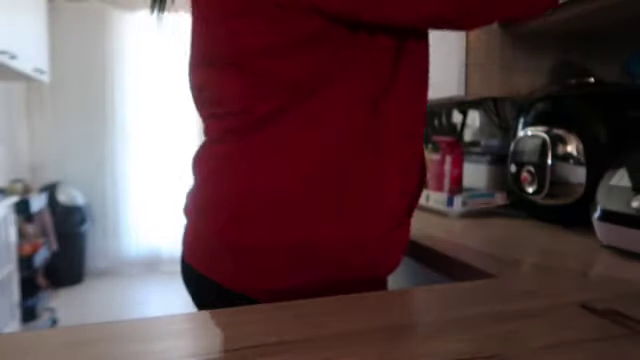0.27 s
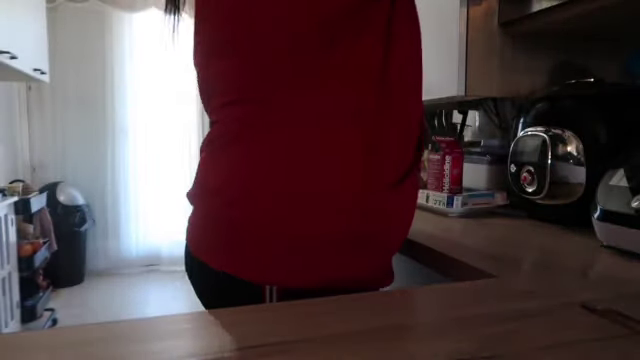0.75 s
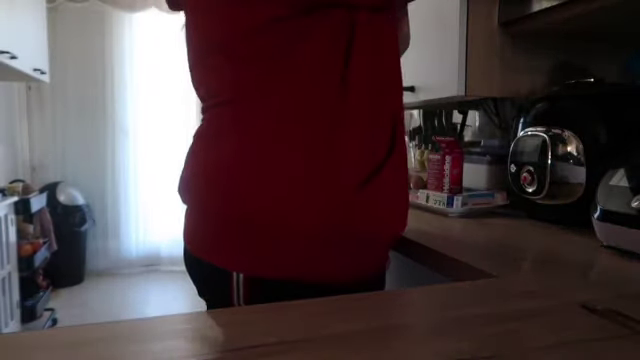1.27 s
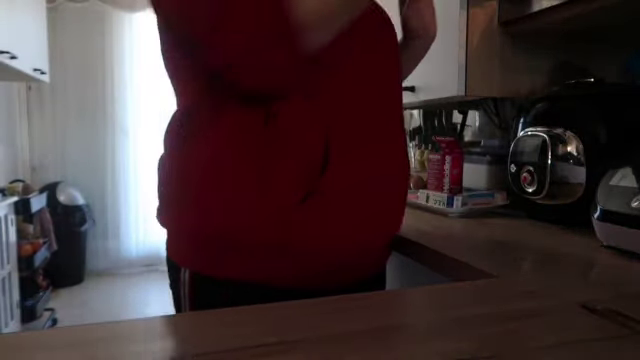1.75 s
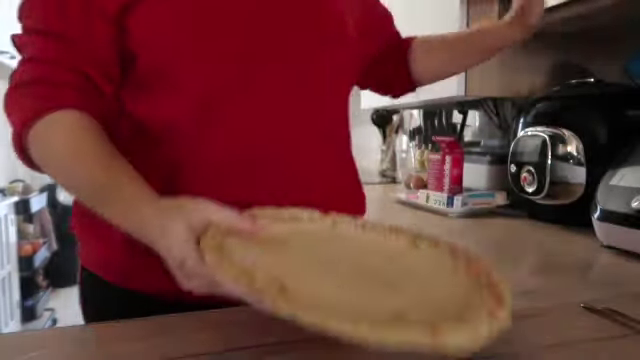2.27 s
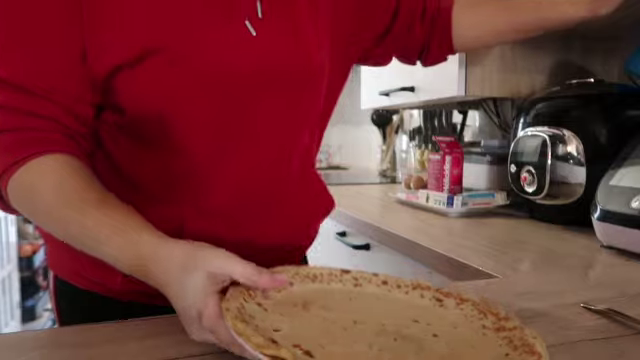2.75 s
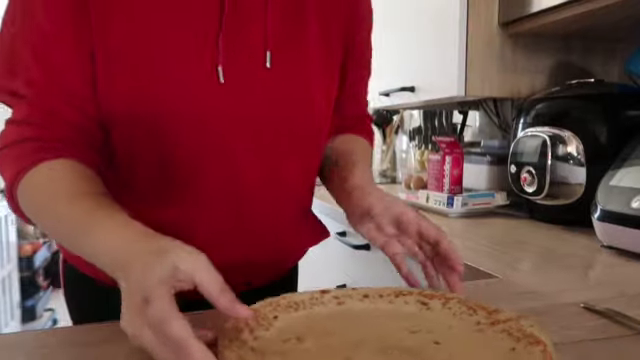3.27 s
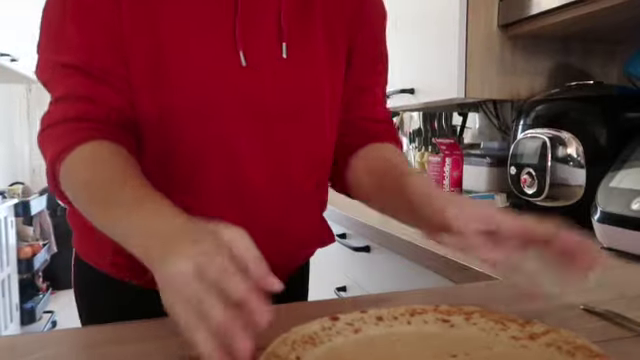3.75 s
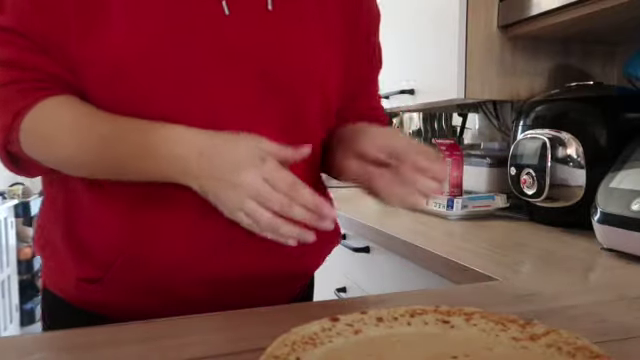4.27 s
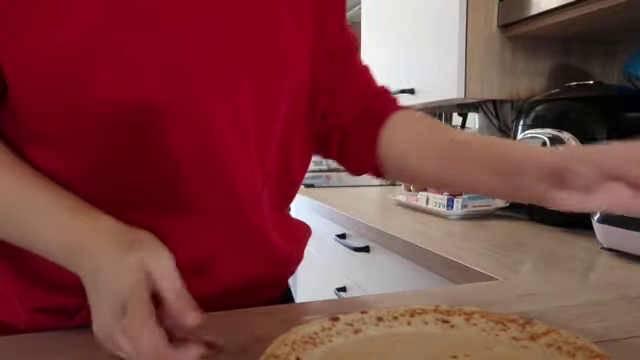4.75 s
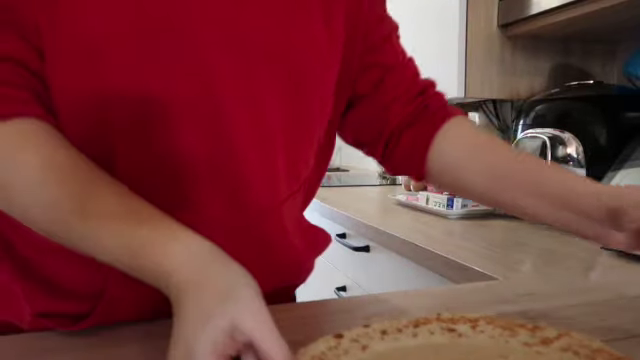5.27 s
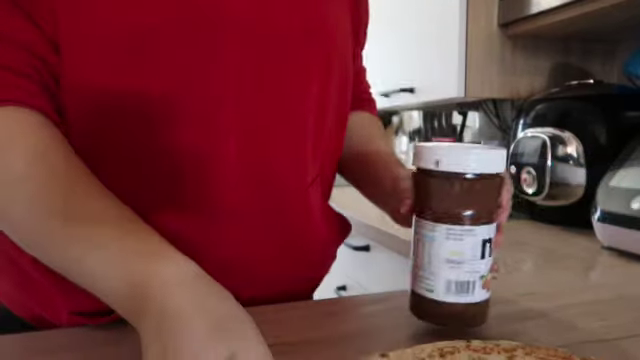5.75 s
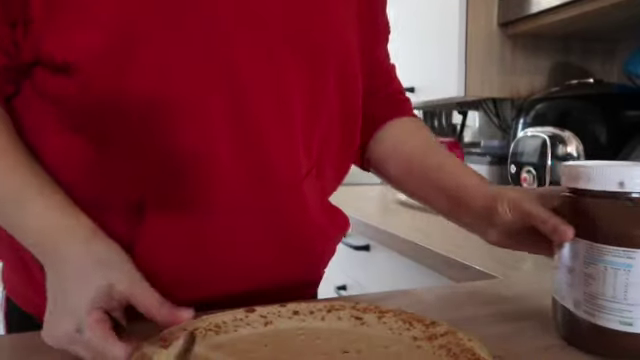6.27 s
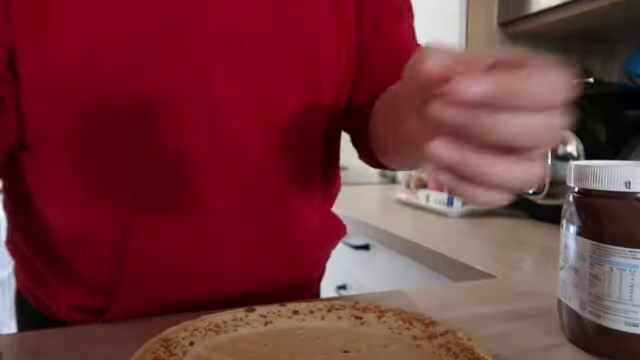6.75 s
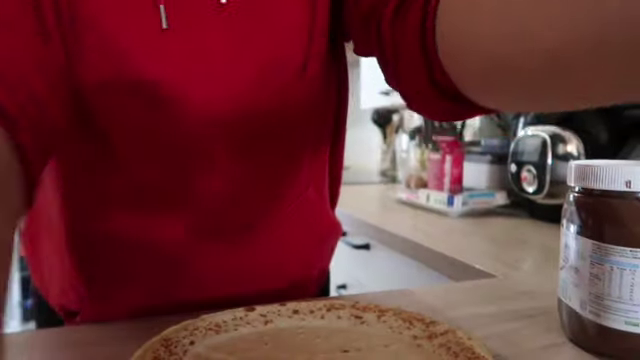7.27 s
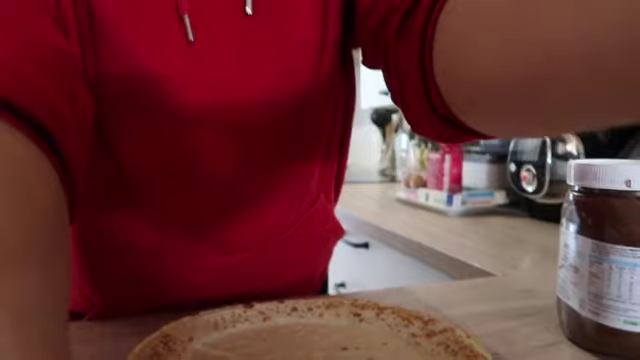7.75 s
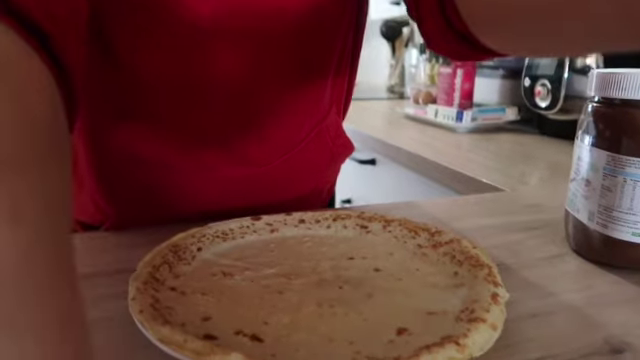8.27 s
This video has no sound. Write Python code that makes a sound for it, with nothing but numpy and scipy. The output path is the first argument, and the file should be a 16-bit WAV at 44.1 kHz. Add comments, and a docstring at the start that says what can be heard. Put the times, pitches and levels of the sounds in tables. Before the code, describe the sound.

Close to a wooden worktop, with quiet room tone: slightly distant plates rattle and slide apart, then one bangs down on the wood and scuffs along it. After a pause a heavy jar scrapes in low, uneven strokes and lands with a very hard knock. A spoon strikes the top, bouncing in rapid bright ticks with a shimmering steel ring, followed by near silence and soft finger taps.

```python
"""In a home kitchen a plate is drawn from a stack in a cupboard, set down and pushed over a wooden worktop.
A glass jar is dragged and knocked on the wood, then a spoon is dropped and slides, ringing; fingers tap close by.
Knocks (a blow and its chatter) and slides (grit of tiny slips) excite modal bodies; slips ring the spoon's steel.
A mid-side microphone close to the worktop hears it with the kitchen's reverberation, over a low room tone;
its converter clips on the hardest blows."""
import sys
import numpy as np
from scipy import signal
from scipy.fft import rfft, irfft, next_fast_len
from scipy.io import wavfile
from scipy.ndimage import uniform_filter1d

SR = 44100
rng = np.random.default_rng(int(sys.argv[2]) if len(sys.argv) > 2 else 0)


def pcm_store(signal):
    """Save signal as 16-bit PCM."""
    levels = np.round(np.clip(np.atleast_2d(signal), -1, 1) * 32767)
    wavfile.write(sys.argv[1], SR, levels.astype(np.int16).T)


N = 375404  # samples

# room tone spectra, mid and side: [f/Hz, relative density/dB]
TONE_MID = [(12, -25.5), (20, -3), (47, -5), (83, -17.5), (145, 2.5), (180, -3), (225, 2), (315, -6),
            (362, -7), (416, -5.5), (549, -13), (631, -11), (767, -14), (2210, -16), (5230, -26),
            (10500, -38), (15500, -59)]
TONE_SIDE = [(24, -64), (40, -27.5), (129, -7), (449, 1.5), (881, -4), (3140, -8.5), (3740, -8),
             (10900, -20.5), (13300, -28), (15500, -43.5)]
# level of the hum in the room tone, which the hiss follows in part: [t/s, level/dB]
HUM_LEVEL = [(0.0, -49), (0.32, -53), (0.55, -44.5), (0.7, -41), (0.8, -48.5), (2.58, -49.5), (2.9, -80),
             (3.1, -62), (3.9, -53.5), (4.3, -55), (4.9, -49.5), (6.55, -65), (6.8, -56), (7.65, -64.5),
             (8.0, -62.5), (8.51, -57)]
HISS_DB, HISS_SHARE = -28, 0.61  # hiss level at a hum of 0 dB; dB of hiss per dB of hum
# level of the rumble before the swells under the thuds: [t/s, level/dB]
RUMBLE_LEVEL = [(0.0, -50), (0.4, -64), (0.52, -28), (0.8, -52.5), (1.7, -57.5), (2.5, -50), (3.1, -65),
                (4.8, -51), (6.9, -54), (7.4, -76.5), (8.0, -83.5), (8.51, -68)]
SHAKE_DB, SHAKE_T60 = -25.5, 0.1  # swell of the rumble relative to a thud; its decay, s

# reverberation time of the kitchen: [f/Hz, t60/s]
KITCHEN_T60 = [(100, 0.54), (400, 0.13), (1500, 0.38), (4000, 0.19), (12000, 0.21)]
EARLY_DB, EARLY_T60 = -8, 0.04  # first echoes at the side capsule; decay in s
# gain of the side capsule's direct sound, echoes and tail: [f/Hz, gain/dB]
SIDE_GAIN = [(60, -24), (110, -37.5), (200, -31.5), (380, -26.5), (700, -25.5), (1290, -17.5), (2380, -20),
             (4400, -4.5), (8120, 3), (15000, 24.5)]
EDGE_HZ = 15600  # band limit after the converter

# modes of the stacked plates: [f/Hz, relative level/dB, t60/s]; broad colour: [f/Hz, relative density/dB]
STACK_MODES = [(360, 3.5, 0.23), (413, 7.5, 0.25), (727, 11.5, 0.14), (937, 7, 0.11), (1040, 6, 0.09),
               (1115, 4, 0.086), (1287, 6, 0.076), (1370, 5.5, 0.036), (1540, -0.5, 0.083), (1830, 1, 0.13),
               (2140, 4.5, 0.19), (2260, 9, 0.054), (2750, 1.5, 0.1), (3340, -2.5, 0.13)]
STACK_COLOUR = [(59, -48), (100, -18.5), (268, -35), (352, -9.5), (582, -21), (703, -12.5), (1020, -4),
                (1530, -13), (2050, -4), (2580, -19.5), (3390, -14), (3680, -32.5), (4730, -35.5),
                (15000, -81.5)]
# the drawn plate: modes [f/Hz, relative level/dB, t60/s]; broad colour [f/Hz, relative density/dB]
PLATE_MODES = [(354.3, 2.7, 0.1), (834, 2.1, 0.1), (974.6, 6.7, 0.07), (1090, 8, 0.076), (1355, 7.5, 0.05),
               (1790, 4.7, 0.19), (1932, 3.2, 0.08), (3148, 6, 0.072), (3442, 7.8, 0.023)]
PLATE_COLOUR = [(59, -40.5), (100, -7), (285, -23.5), (345, -1.5), (582, -21), (1050, -4), (1570, -11.5),
                (1840, -9.5), (2580, -25), (3460, -24.5), (15000, -78.5)]
# the worktop: modes [f/Hz, relative level/dB, t60/s]; broad colour [f/Hz, relative density/dB]
WOOD_MODES = [(234, 3.5, 0.094), (266.4, 4.9, 0.074), (337.5, 5.1, 0.13), (418.4, 0.47, 0.054),
              (526.3, 6.1, 0.11), (673, 3, 0.02), (883, 1.1, 0.1), (1043, 0.38, 0.066), (1323, 6, 0.035),
              (1680, 3.6, 0.013), (2112, 6, 0.011), (2463, 0.77, 0.077)]
WOOD_COLOUR = [(35, -48.5), (60, -32.5), (178, -19), (214, -12), (364, -6), (458, -8), (679, -9),
               (916, -15.5), (2420, -21.5), (6380, -52.5), (15000, -88.5)]
# bowl of the spoon: modes [f/Hz, relative level/dB, t60/s]; broad colour [f/Hz, relative density/dB]
BOWL_MODES = [(573, 7.9, 0.04), (868, 6.6, 0.28), (1100, 0.64, 0.02), (1304, 0.5, 0.095),
              (1500, 1.1, 0.062), (1746, 11, 0.039), (1975, 1.5, 0.031), (2226, 1.9, 0.076),
              (2580, 4.6, 0.022)]
BOWL_COLOUR = [(59, -55), (100, -24), (505, -13.5), (722, -9.5), (1270, -4.5), (1850, -5.5), (2000, 6.5),
               (5020, -15), (5520, -9.5), (9000, -27), (11700, -49), (16000, -67)]
# edges between bass, middle and treble, Hz
CROCKERY_BANDS_HZ, WOOD_BANDS_HZ, BOWL_BANDS_HZ = (1500, 4000), (800, 3000), (1500, 4000)
# treble against bass, a row for knocks then one for slides: [offset/dB, slope/(dB per dB of hardness)]
STACK_TREBLE = [(-17.5, 1.5), (-7, 2)]
PLATE_TREBLE = [(-30, 1.6), (-13, 0.84)]
WOOD_TREBLE = [(-28.5, 3.5), (-9.5, 1.47)]
BOWL_TREBLE = [(-19, 0.89), (-27, 13)]

# knocks, hardness being middle against bass: [t/s, bass peak level/dB, hardness/dB, chatter time constant/ms]
STACK_KNOCKS = [(0.519, -33.5, -5, 25), (0.597, -27, -0.5, 6.6), (0.623, -21.5, 0, 17),
                (1.154, -29.5, -25, 4.1)]
PLATE_KNOCKS = [(1.231, -23, 0, 7.9), (1.357, -17, 0.008, 10)]
SPOON_KNOCKS = [(6.78, -21.5, -10.5, 6.8), (6.881, -2.5, -5.5, 5), (6.927, -10, -9.5, 22),
                (6.994, -2.5, 5.5, 3.9), (7.032, -22, -5.5, 6), (7.85, -44.5, 5.5, 3.8),
                (7.916, -33.5, 6, 1)]
# knocks on the wood: the same four columns, then [strength of the board thud/dB]
WOOD_KNOCKS = [(2.437, -42.5, 6, 5, -50), (2.594, -4, 1, 5.1, -23.5), (2.612, -17, 2, 11, -21.5),
               (2.656, -11.5, 1.5, 9.4, -3), (2.743, -6.5, 2, 0.2, -24), (2.766, -13.5, -6.5, 5, -30.5),
               (3.114, -35, -3, 11, -36.5), (3.154, -24, -3, 11, -33.5), (3.234, -28, -2.5, 3.8, -38.5),
               (3.277, -23.5, -3, 19, -34.5), (3.299, -22.5, 1.5, 6, -39.5), (3.334, -17, -1.5, 16, -34),
               (3.392, -13, 4, 3.6, -45.5), (3.404, -12, 3, 13, -36.5), (3.998, -34, -8, 9.5, -33),
               (4.029, -43, 9.5, 5.8, -34.5), (4.066, -36.5, 10, 6.9, -45), (4.901, -36, -9, 3.2, -34.5),
               (5.046, -23, -15, 13, -34), (5.081, -27.5, 5.5, 6.1, -33), (5.103, -9.5, -15, 18, -15.5),
               (5.238, -18.5, -14, 8.2, -31), (5.404, -13, -8, 8, -38.5), (5.778, -20, -12, 10, -26),
               (6.029, 3, -4.5, 3.4, -19), (6.038, -12, -9.5, 3.6, -30.5), (6.086, -7.5, -12, 1.3, -21),
               (7.531, -33, -15.5, 7.2, -48.5), (7.738, -44, -10, 9.3, -49.5), (7.854, -40.5, 2, 5.4, -53),
               (7.883, -43.5, -19, 12.6, -54)]
# slides, one curve per stroke, brightness being middle against bass: [t/s, bass level/dB, brightness/dB]
STACK_SLIDES = [
    [(0.62, -34.5, 4.5), (0.634, -24.5, 4.5), (0.68, -39.5, -16), (0.78, -53, -3)],
    [(0.79, -44.5, -0.5), (0.86, -23.5, -3.5), (0.94, -22, -4), (1.0, -22.5, -9.5), (1.13, -43, -8.5),
     (1.2, -51, -15)],
]
PLATE_SLIDES = [
    [(1.232, -34.5, -1.5), (1.292, -25, -1.5), (1.348, -32.5, -3.5), (1.382, -18.5, -3.5), (1.42, -43.5, 6),
     (1.46, -46, -4.5), (1.52, -52, 6)],
]
WOOD_SLIDES = [
    [(2.6, -37, 2), (2.638, -32, 2), (2.666, -23, -19), (2.738, -39, -6)],
    [(2.75, -24, -5.5), (2.806, -32, -7), (2.892, -49, -1), (3.05, -51, -11)],
    [(3.125, -47.5, 1), (3.157, -31.5, -8.5), (3.217, -44.5, -7.5), (3.386, -28, -14), (3.416, -29.5, -13),
     (3.45, -34.5, -6), (3.53, -30, -9.5), (3.66, -29, -8.5), (3.754, -33.5, -13.5), (3.9, -77, 5)],
    [(3.99, -47.5, -11), (4.04, -44.5, -10), (4.082, -58, 17), (4.176, -79, 18), (4.25, -83, 19)],
]
JAR_SLIDES = [
    [(5.06, -37, -17.5), (5.095, -27.5, -12), (5.11, -14.5, -17), (5.15, -22, -18.5), (5.19, -30.5, -10),
     (5.31, -22.5, -12.5), (5.385, -24.5, -6), (5.41, -15.5, -12.5), (5.51, -19, -9.5), (5.57, -15, -11.5),
     (5.63, -20, -9), (5.68, -25.5, -16.5), (5.765, -51, 3)],
    [(5.765, -35, -5.5), (5.79, -32.5, -8.5), (5.913, -18.5, -7), (6.02, -21.5, -5), (6.06, -30, -8.5),
     (6.17, -22, -8.5), (6.386, -22.5, -17), (6.448, -37.5, -26.5), (6.55, -54.5, -6)],
]
SPOON_SLIDES = [
    [(6.79, -54.5, -3.5), (6.87, -47, -17)],
    [(6.885, -14, -15.5), (6.914, -35.5, -4), (6.946, -30.5, -5), (6.992, -39, 3.5), (7.002, -28.5, 1.5),
     (7.15, -25, 1.5), (7.22, -30, 1.5), (7.398, -34, 1), (7.512, -51.5, 1.5), (7.62, -66, 1),
     (7.7, -70, 2.5)],
]

# two bands of the crockery that drift, one curve each: [t/s, f/Hz]
CROCKERY_FAVOURED = [
    [(0.83, 896), (0.95, 1023), (1.05, 993), (1.4, 1028)],
    [(0.82, 3500), (1.0, 3400), (1.22, 3520), (1.4, 3430)],
]
# low modes favoured as the place of contact moves over the worktop: [t/s, f/Hz]
WOOD_FAVOURED = [(2.64, 500), (2.66, 308), (2.73, 342), (2.745, 494), (2.9, 480), (3.13, 293), (3.39, 430),
                 (3.47, 296), (3.56, 410), (3.66, 297), (3.77, 285), (5.08, 257), (5.24, 247), (5.3, 352),
                 (5.41, 387.5), (5.599, 396), (5.67, 488), (5.781, 411), (6.03, 413), (6.141, 330),
                 (6.29, 341), (6.399, 244), (7.53, 408.6)]

# single clear notes of crockery: [t/s, f/Hz, level/dB, t60/s]
PINGS = [(1.146, 1370, -30.5, 0.071), (1.382, 1790, -11.5, 0.087)]
# faint fluttering tone while the plate is carried: [t/s, level/dB]
CARRY_LEVEL = [(1.45, -56.5), (1.55, -53), (2.05, -62), (2.35, -57.5), (2.55, -68.5)]
CARRY_HZ, CARRY_WIDTH_HZ = 653, 66
# colour of the thin hiss: [f/Hz, relative density/dB]
FIZZ_COLOUR = [(3500, -30), (5000, -3), (6200, 1), (7500, -9.5), (9000, -18), (11000, -40.5)]
# its level while the jar is moved: [t/s, level/dB]
FIZZ_LEVEL = [(5.08, -73), (5.25, -63), (5.5, -65.5), (5.72, -58.5), (5.95, -55), (6.25, -69), (6.42, -87)]
# its level as a sleeve brushes while the arm comes down: [t/s, level/dB]
RUSTLE_LEVEL = [(1.2, -71), (1.33, -57.5), (1.78, -72), (1.86, -57), (1.94, -80)]
# modes of the landing plate: [f/Hz, level against the blow/dB, t60/s]; blows: [t/s, level/dB]
LANDING_MODES = [(501, 1, 0.034), (708, -13, 0.36), (823, -7, 0.18), (890, -9.5, 0.31), (1150, -8.5, .06),
                 (1630, -7, .05)]
LANDINGS = [(2.596, -15), (2.656, -25.5), (2.745, -12.5), (3.392, -31)]
# bright clash as the plate lands: colour [f/Hz, relative density/dB]; bursts [t/s, level/dB, time constant/ms]
CLASH_COLOUR = [(1180, -40.5), (2000, -5), (3280, 0), (6320, -16), (6840, -19.5), (7810, -17.5),
                (11600, -33.5), (13000, -64)]
CLASHES = [(2.595, -24.5, 2.3), (2.611, -30, 9.2), (2.638, -25, 16), (2.656, -14, 6.4), (2.744, -34, 2.4)]
BOARD_HZ, BOARD_T60 = 146, 0.086  # the whole worktop bends under a heavy blow; decay in s

# ticks of the rattling spoon: [t/s, burst level/dB, burst time constant/ms, pitch f/Hz]
RATTLES = [(7.0313, -16.5, 1.6, 5620), (7.046, -18, 1.8, 3726), (7.0664, -18, 1.6, 3260),
           (7.0879, -13.5, 2, 3910), (7.12, -17.5, 1.5, 6200), (7.143, -15.5, 1.3, 3684),
           (7.1694, -12.5, 2, 1976), (7.189, -20, 1.2, 1755), (7.212, -18, 1.6, 1966),
           (7.252, -19, 1.8, 2720), (7.3195, -21.5, 1.7, 1880), (7.369, -25.5, 1.3, 1690),
           (7.4039, -27, 1.7, 3800), (7.4271, -30, 2, 2230)]
# colour of their bursts: [f/Hz, relative density/dB]
TICK_COLOUR = [(1200, -28.5), (2000, -7), (3100, 7.5), (4300, -17), (5600, -11), (8500, -30), (13000, -54)]
TICK_LIFT_DB, TICK_T60 = -3, 0.025  # short ring of each tick, against its burst; decay in s
# steel modes of the spoon, each group swelling and fading together: [f/Hz, group index]
STEEL_MODES = [(3058, 0), (3505, 0), (4506, 1), (4652, 4), (5476, 2), (7273, 2), (8533, 2), (10402, 3),
               (10910, 3), (11900, 3), (13092, 3), (14056, 3), (14690, 3)]
# gains of each steel mode: [gain to mid capsule/dB, gain to side capsule/dB]
STEEL_TRIM_DB = [(1, -26.5), (-8, -19), (3, -2), (-0.5, -11.5), (1, 2.5), (-16.5, -17), (-22, -2.5),
                 (3.5, 8), (-24, 19.5), (2.5, 5), (-20, 4.5), (-22, -6.5), (-49, -5.5)]
# one level curve per group of steel modes while the spoon rings,
# before damping, restriking and trim: [t/s, level/dB]
STEEL_LEVELS = [
    [(6.9, -49), (6.964, -39), (7.048, -24), (7.07, -21.5), (7.096, -30.5), (7.156, -23.5), (7.19, -40),
     (7.208, -30), (7.238, -45), (7.346, -37), (7.37, -54), (7.398, -43), (7.5, -59)],
    [(6.97, -60), (6.992, -44), (7.07, -53), (7.096, -47), (7.188, -41), (7.262, -37), (7.332, -39),
     (7.41, -56.5), (7.5, -49), (7.55, -65.5)],
    [(6.95, -54), (7.038, -33), (7.066, -38), (7.096, -25.5), (7.132, -29), (7.182, -32.5), (7.2, -37),
     (7.31, -40), (7.358, -34.5), (7.416, -47.5), (7.44, -45), (7.58, -75)],
    [(6.99, -70), (7.012, -76), (7.044, -52.5), (7.064, -64), (7.108, -45), (7.292, -68.5), (7.4, -88),
     (7.5, -84)],
    [(6.9, -47), (6.958, -48.5), (6.985, -39), (7.056, -45), (7.09, -37), (7.216, -46), (7.258, -45),
     (7.3, -50)],
]
STEEL_TAIL_DB_PER_S = 150  # extra fall after the end of each curve
DAMPED, DAMPED_S = 0.21, 0.0048  # touching the wood stifles this share of the ring, this long before a tick
RESTRUCK, RESTRUCK_T60 = 0.34, 0.3  # share of the ring that each tick renews; its decay, s


def amp(db):
    """Level: decibels to amplitude ratio."""
    return 10 ** (np.asarray(db) / 20)


def evened(x):
    """Normalisation to unit root mean square."""
    return x / np.sqrt(np.mean(np.square(x)) + 1e-20)


def read(points, hz):
    """Interpolation of a spectrum along a logarithmic frequency axis."""
    f, value = np.transpose(points)
    return np.interp(np.log(hz + 1), np.log(f + 1), value)


def shaped(x, gain):
    """Linear filtering: multiplies the spectrum by gain(hz)."""
    size = next_fast_len(x.shape[-1])
    return irfft(rfft(x, size) * gain(np.fft.rfftfreq(size, 1 / SR)), size)[..., :x.shape[-1]]


def causal(points):
    """Minimum phase: a filter with this spectrum that starts at once and does not ring ahead."""
    hz = abs(np.fft.fftfreq(8192, 1 / SR))
    log_gain = np.log(amp(np.maximum(read(points, hz), -100)))
    return np.fft.ifft(np.exp(np.conj(signal.hilbert(log_gain)))).real[:4096]


def curves(tables, outside):
    """Piecewise linear motion: joins tables (t, value, ..) into one row of samples for each value column."""
    t = np.arange(N) / SR
    out = np.full((len(tables[0][0]) - 1, N), float(outside))
    for s, *columns in map(np.transpose, tables):
        inside = (t >= s[0]) & (t <= s[-1])
        out[:, inside] = [np.interp(t[inside], s, c) for c in columns]
    return out


def resonator(hz, width_hz):
    """Damped resonance: one second-order section whose pole radius sets the bandwidth."""
    r = np.exp(-np.pi * width_hz / SR)
    return [1, 0, 0, 1, -2 * r * np.cos(2 * np.pi * hz / SR), r * r]


def tilted(db, bright_db, treble):
    """Contact hardness: gains of bass, middle and treble for one level and brightness."""
    offset_db, slope = treble
    return amp([db, db + bright_db, db + offset_db + slope * bright_db])


def grit(per_s, spread_db, count=N):
    """Stick-slip friction: a dense hail of tiny slips, a few of them large."""
    size = amp(spread_db * np.minimum(rng.exponential(1, count), 3)) * rng.standard_normal(count)
    return evened(size * (rng.random(count) < per_s / SR))


def body(modes, colour, modes_db, bands_hz):
    """Modal impulse response as bass, middle and treble of energy 1: clear modes over a broad colour."""
    t = np.arange(SR // 4) / SR
    clear = sum(amp(db - 60 * t / t60) * np.sin(2 * np.pi * hz * t) / np.sqrt(t60) for hz, db, t60 in modes)
    click = (t == 0) + amp(modes_db) * clear / np.linalg.norm(clear)
    both = signal.fftconvolve(click, causal(colour))[:len(t)]
    cuts = (bands_hz[0], "low"), (bands_hz, "band"), (bands_hz[1], "high")
    parts = np.array([signal.sosfilt(signal.butter(3, hz, kind, fs=SR, output="sos"), both) for hz, kind in cuts])
    return parts / np.linalg.norm(parts, axis=1, keepdims=True)


def played(response, knocks, slides, treble, per_s, spread_db, first, own=1.35):
    """Source and resonator: knocks (a first blow, a short chatter) and slides (grit) ring the same body."""
    slips = grit(per_s, spread_db)
    # part of the slips is common to all bands, part (rolled by whole seconds) is felt in one band only
    slips = evened([slips + own * np.roll(slips, k * SR) for k in (1, 2, 3)])
    drive = slips * tilted(*curves(slides, -120), treble[1])
    t = np.arange(2000) / SR
    chatter = rng.standard_normal((len(knocks), 2000))
    chatter[:, 0] = first
    for noise, (s, db, hard_db, ms, *_) in zip(chatter, knocks):
        contact = noise * np.exp(-1000 * t / ms)
        peaks = abs(signal.fftconvolve(contact[None], response[:, :2000], axes=1)).max(1)
        gains = tilted(db, hard_db, treble[0]) / peaks
        drive[:, round(s * SR):][:, :2000] += gains[:, None] * contact
    return signal.oaconvolve(drive, response, axes=1)[:, :N].sum(0)


def favoured(x, curve, db, width_hz):
    """Heterodyne band-pass: adds a band whose centre follows a curve."""
    hz = np.interp(np.arange(N) / SR, *np.transpose(curve))
    turn = np.exp(2j * np.pi * np.cumsum(hz) / SR)
    r = np.exp(-np.pi * width_hz / SR)
    band = 2 * (turn * signal.lfilter([1 - r], [1, -r], x / turn)).real
    return x + amp(db) * band


def bursts(rows, points):
    """Transient friction: short gritty bursts that start at once and die exponentially, all in one colour."""
    t, colour, shape = np.arange(SR // 4) / SR, causal(points), np.zeros(N)
    for s, db, ms in rows:
        shape[round(s * SR):][:len(t)] += amp(db) * np.exp(-1000 * t / ms)
    return signal.oaconvolve(shape * grit(13000, 1.6), colour / np.linalg.norm(colour))[:N]


def thuds():
    """Impulsive excitation: one click per knock on the wood, as strong as its thud."""
    blows = np.zeros(N)
    for s, *_, db in WOOD_KNOCKS:
        blows[round(s * SR)] = amp(db)
    return blows


def room_tone():
    """Stationary noise made patchy: mid and side, split into rumble, hum and hiss with levels of their own."""
    frames, hz = N // 256 + 5, np.fft.rfftfreq(1024, 1 / SR)
    a, b, c, d, patches = rng.standard_normal((frames, 513, 5)).T
    patches = evened(uniform_filter1d(uniform_filter1d(patches, 8, 0), 10, 1))
    spectra_db = np.array([read(TONE_MID, hz), read(TONE_SIDE, hz) - 15])[:, :, None]
    grains = np.array([a + 1j * b, c + 1j * d]) * amp(spectra_db + 2.0 * patches)
    noise = signal.istft(grains, nperseg=1024, noverlap=768)[1][:, :N]
    rumble = shaped(noise, lambda f: 1 / (1 + (f / 90) ** 4))
    hiss = shaped(noise, lambda f: 1 - 1 / (1 + (f / 900) ** 2))
    hum = noise - rumble - hiss
    hum_db, t = curves([HUM_LEVEL], -66)[0], np.arange(SR // 2) / SR
    shake = signal.oaconvolve(thuds(), amp(SHAKE_DB - 60 * t / SHAKE_T60))[:N]
    gains = amp(curves([RUMBLE_LEVEL], -68)[0]) + shake, amp(hum_db), amp(HISS_DB + HISS_SHARE * hum_db)
    return sum(p / p[0].std() * g for p, g in zip((rumble, hum, hiss), gains))


def kitchen():
    """Diffuse reverberation: two tails of sparse random taps, each band dying at its own speed."""
    taps = np.zeros((2, SR // 2))
    at = np.arange(120, SR // 2 - 20, 20) + rng.integers(0, 20, (2, (SR // 2 - 121) // 20))
    np.put_along_axis(taps, at, rng.choice([-1., 1.], at.shape), 1)
    hz, t, z = signal.stft(taps, SR, nperseg=256)
    tail = signal.istft(z * amp(-60 * t / read(KITCHEN_T60, hz)[:, None]), SR, nperseg=256)[1]
    return tail / np.linalg.norm(tail, axis=1, keepdims=True)


def fizz():
    """Friction noise: a thin high hiss as the jar is moved, and the brush of a sleeve."""
    hiss = evened(signal.oaconvolve(grit(4600, 1.5), causal(FIZZ_COLOUR))[:N])
    return hiss * amp(curves([RUSTLE_LEVEL, FIZZ_LEVEL], -120)[0])


def carried():
    """Random excitation of a resonance: sparse slips ring one low mode on and off."""
    mode = resonator(CARRY_HZ, CARRY_WIDTH_HZ)
    return evened(signal.sosfilt([mode, mode], grit(180, 2.8))) * amp(curves([CARRY_LEVEL], -120)[0])


def pings():
    """Free vibration of a single mode: a plate sings out for a moment."""
    t, out = np.arange(SR // 4) / SR, np.zeros(N)
    for s, hz, db, t60 in PINGS:
        envelope = amp(db - 60 * t / t60) * (1 - np.exp(-t / 0.0045))
        out[round(s * SR):][:len(t)] += envelope * np.sin(2 * np.pi * hz * t)
    return out


def crockery():
    """Modal excitation of stack and drawn plate, with bands that drift as the plates slide apart."""
    stack_body = body(STACK_MODES, STACK_COLOUR, -9.5, CROCKERY_BANDS_HZ)
    plate_body = body(PLATE_MODES, PLATE_COLOUR, -2.2, CROCKERY_BANDS_HZ)
    stack = played(stack_body, STACK_KNOCKS, STACK_SLIDES, STACK_TREBLE, 6000, 0.68, first=4.0)
    plate = played(plate_body, PLATE_KNOCKS, PLATE_SLIDES, PLATE_TREBLE, 5400, 1.4, first=7.2)
    both = stack + plate
    for curve in CROCKERY_FAVOURED:
        both = favoured(both, curve, db=-0.5, width_hz=38)
    return both


def landing():
    """Free vibration after impact: each blow sets the modes of the plate ringing."""
    t, out = np.arange(SR // 4) / SR, np.zeros(N)
    ring = sum(amp(db - 60 * t / t60) * np.sin(2 * np.pi * hz * t) for hz, db, t60 in LANDING_MODES)
    for s, db in LANDINGS:
        out[round(s * SR):][:len(t)] += amp(db) * ring
    return out


def steel():
    """Narrow resonance under friction: slips of the spoon ring its modes unevenly, each radiating its own way."""
    start = round(SPOON_SLIDES[1][0][0] * SR)
    t, out = (start + np.arange(SR)) / SR, np.zeros((2, N))
    level = []
    for rows in STEEL_LEVELS:
        tail_db = STEEL_TAIL_DB_PER_S * np.maximum(t - rows[-1][0], 0)
        level.append(amp(np.interp(t, *np.transpose(rows), left=-120) - tail_db))
    since = t - np.array(RATTLES)[:, :1]
    level = level * (1 - DAMPED * np.exp(-((since / DAMPED_S + 1) ** 2)).max(0))
    since = np.where(since >= 0, since, 1).min(0)  # time since the latest tick
    renewed = 2 * uniform_filter1d(amp(-60 * since / RESTRUCK_T60), size=150)
    level = level * (1 - RESTRUCK + RESTRUCK * renewed)
    for (hz, group), trim_db in zip(STEEL_MODES, STEEL_TRIM_DB):
        mode = resonator(hz, width_hz=26)
        ring = signal.sosfilt([mode, mode], grit(630, 1.7, count=2 * SR))[SR:]  # the first second settles
        loudness = np.sqrt(uniform_filter1d(evened(ring) ** 2, 600) + 0.028)
        ring = signal.hilbert(level[group] * evened(ring / loudness ** 0.75))  # fluctuations partly evened
        out[:, start:start + SR] += amp(trim_db)[:, None] * [ring.real, ring.imag]
    return out


def rattles():
    """Repeated impact: each tick of the spoon is a gritty burst with a short ring at its own pitch."""
    t, out = np.arange(SR // 20) / SR, bursts([row[:3] for row in RATTLES], TICK_COLOUR)
    for s, db, _, hz in RATTLES:
        ring = amp(db + TICK_LIFT_DB - 60 * t / TICK_T60) * np.sin(2 * np.pi * hz * t)
        out[round(s * SR):][:len(t)] += ring
    return out


def spoon():
    """Modal excitation of the bowl by knocks and slips, with the ticks of its rattling."""
    bowl = body(BOWL_MODES, BOWL_COLOUR, -11.5, BOWL_BANDS_HZ)
    return played(bowl, SPOON_KNOCKS, SPOON_SLIDES, BOWL_TREBLE, 550, 2.5, first=0.86) + rattles()


def board():
    """Bending resonance: a low thud under each knock swells over a cycle, holds a few, then is stifled."""
    t = np.arange(SR // 4) / SR
    envelope = amp(-60 * (t / BOARD_T60) ** 2) * (1 - np.exp(-t / 0.0072))
    thud = envelope * np.sin(2 * np.pi * BOARD_HZ * t)
    return amp(-0.5) * signal.oaconvolve(thuds(), thud)[:N]


def worktop():
    """Modal excitation of the wood by knocks and slides, with the thuds, clashes, ring and hiss of contact."""
    wood_body = body(WOOD_MODES, WOOD_COLOUR, -12.5, WOOD_BANDS_HZ)
    wood = played(wood_body, WOOD_KNOCKS, WOOD_SLIDES + JAR_SLIDES, WOOD_TREBLE, 2200, 2.6, first=4)
    wood = favoured(wood, WOOD_FAVOURED, db=-1, width_hz=48)
    return wood + landing() + board() + fizz() + bursts(CLASHES, CLASH_COLOUR)


def scene():
    """Mid-side pickup: crockery from the cupboard, a little drier than the worktop and spoon nearby; left and
    right are mid plus and minus side."""
    far = crockery() + pings() + carried()
    spoon_sound, wood = spoon(), worktop()
    near = wood + spoon_sound
    tails = kitchen()
    send = amp(-9.0) * near + amp(-11.5) * far
    wet = signal.fftconvolve(send[None], tails, axes=1)[:, :N]
    echoes = tails[1] * amp(-60 * np.arange(tails.shape[1]) / SR / EARLY_T60)
    early = signal.oaconvolve(near + far, echoes / np.linalg.norm(echoes))[:N]
    # the side capsule hears the direct sound a quarter cycle off, the spoon from its other face,
    # and first echoes and a tail of its own
    direct = signal.hilbert(wood + far - spoon_sound, next_fast_len(N))[:N].imag
    side = direct + amp(EARLY_DB) * early + amp(-2.5) * wet[1]
    side = shaped(side, lambda hz: amp(read(SIDE_GAIN, hz)))
    mid, side = np.array([near + far + wet[0], side]) + steel() + room_tone()
    return np.array([mid + side, mid - side])


def record(dry):
    """Amplitude limiting: the converter clips; then the band limit."""
    clipped = np.clip(dry, -1, 1)
    low_pass = signal.firwin(511, EDGE_HZ, window=("kaiser", 9), fs=SR)
    return signal.oaconvolve(clipped, low_pass[None], "same")


dry = scene()
out = record(dry)
pcm_store(out)
```